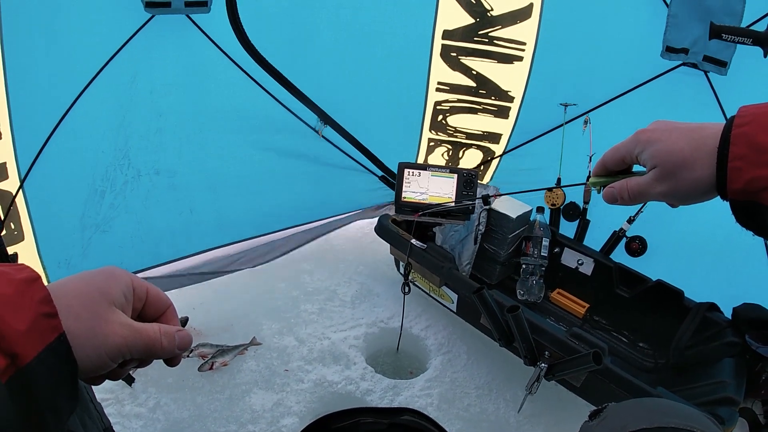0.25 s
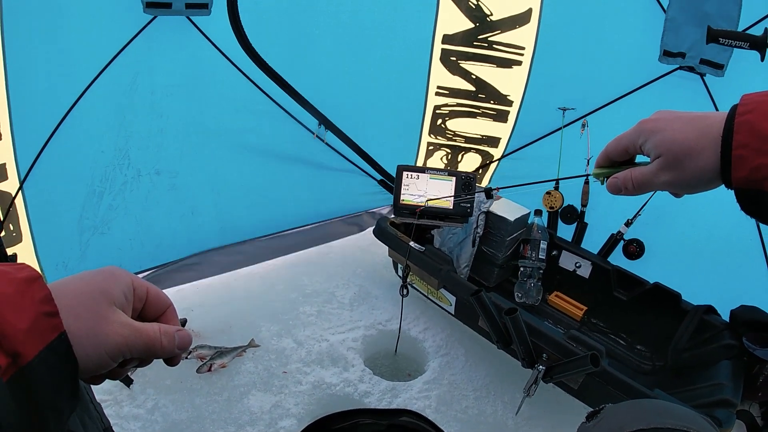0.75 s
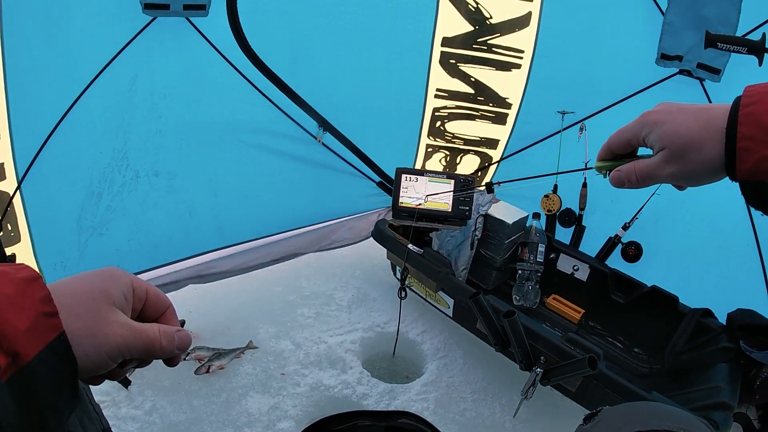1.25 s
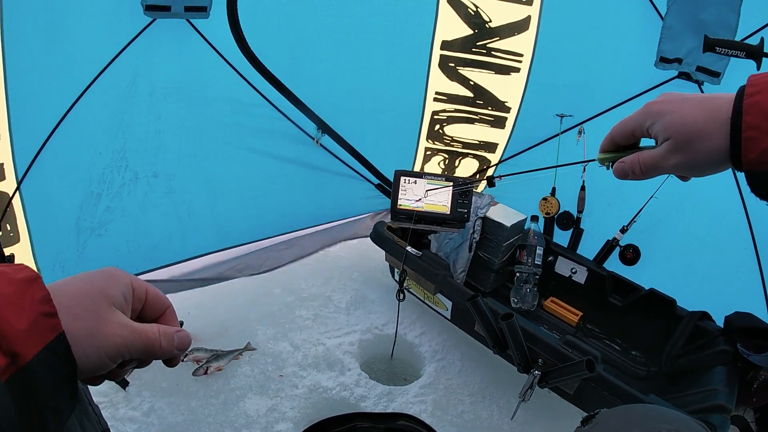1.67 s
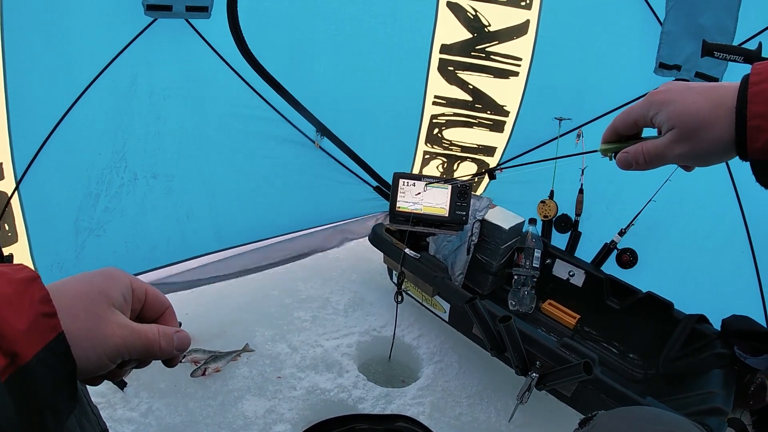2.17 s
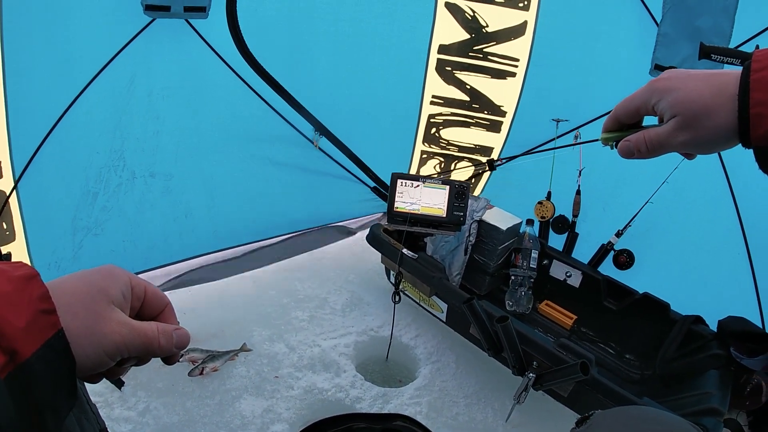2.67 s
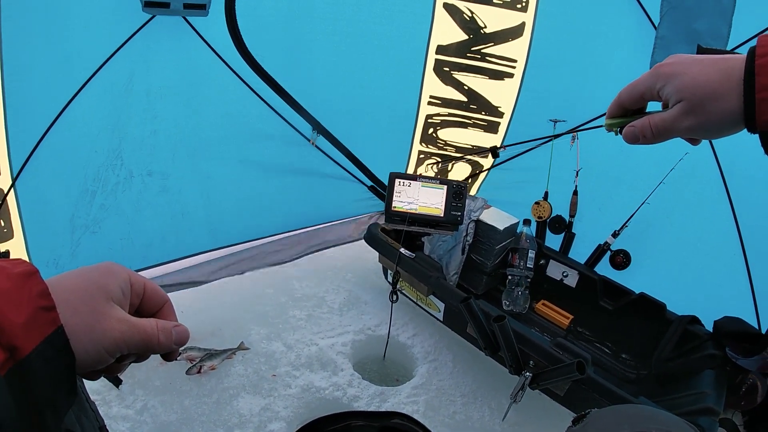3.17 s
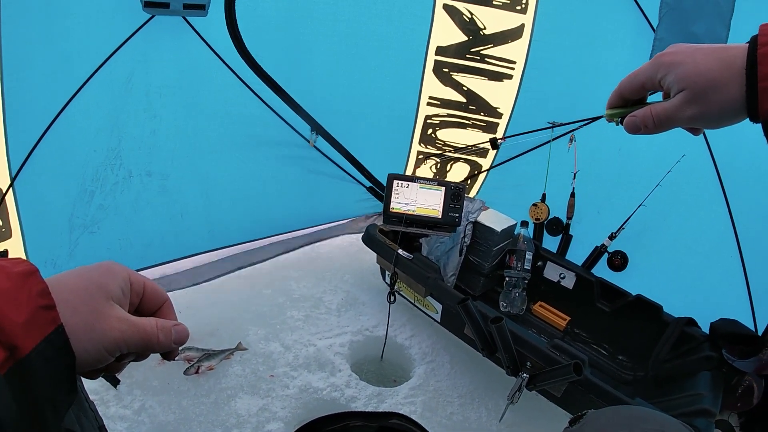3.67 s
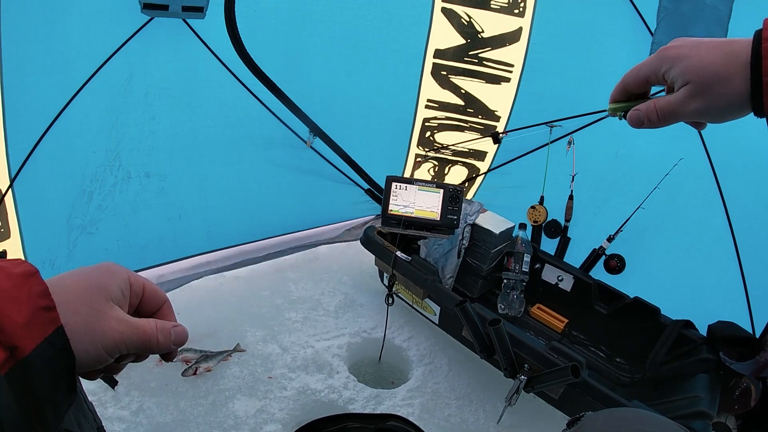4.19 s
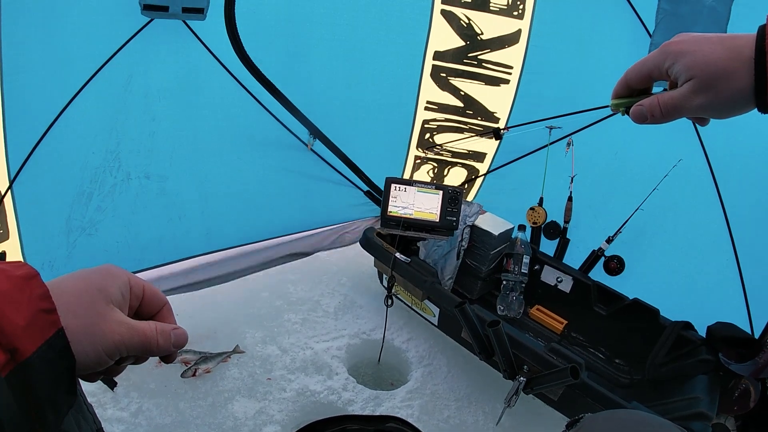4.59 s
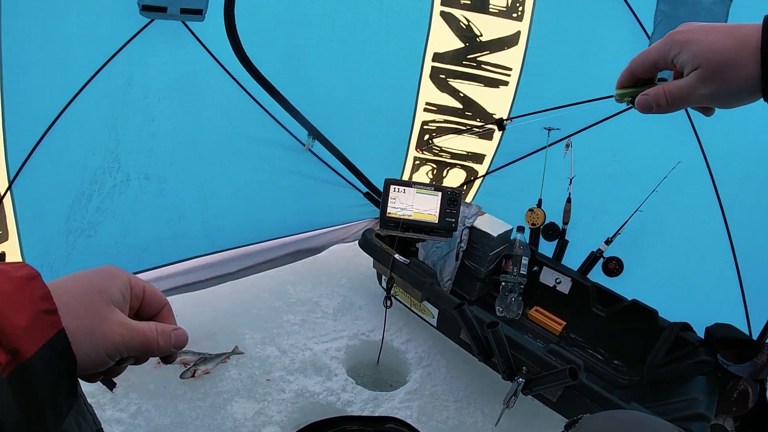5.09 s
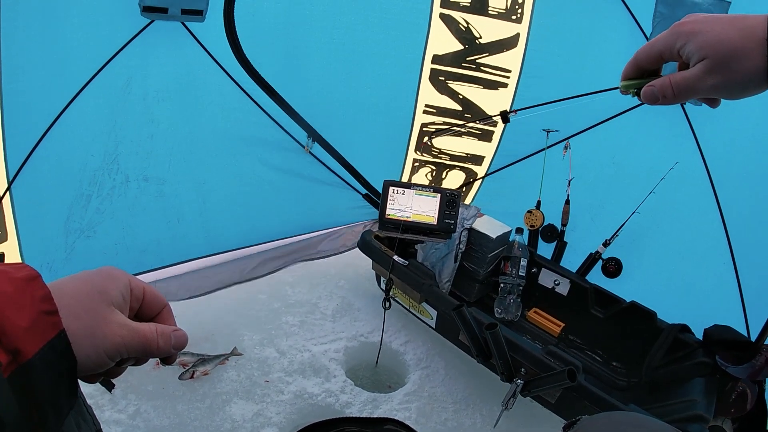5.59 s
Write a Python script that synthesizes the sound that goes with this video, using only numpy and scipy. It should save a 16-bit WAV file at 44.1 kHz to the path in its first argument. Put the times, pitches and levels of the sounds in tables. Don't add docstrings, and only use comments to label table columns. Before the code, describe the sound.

Loose shelter fabric flaps and crackles rapidly in a gale, with taut walls thumping and popping over low wind rumble and hollow roar.

```python
import sys
import numpy as np
from scipy import signal
from scipy.fft import rfft, irfft, next_fast_len
from scipy.io import wavfile
from scipy.ndimage import uniform_filter1d, map_coordinates

SR = 44100
rng = np.random.default_rng(int(sys.argv[2]) if len(sys.argv) > 2 else 0)


def undo_db(level):
    steps = np.asarray(level, float) / 20
    return 10 ** steps


def master(y):
    cut = np.clip(np.atleast_2d(y).T, -1, 1)
    pcm = np.round(cut * 32767)
    wavfile.write(sys.argv[1], SR, pcm.astype(np.int16))


N = 257892

# time in seconds, strength in dB.
WIND_LOAD = [(0.0, -22), (0.06, -19.5), (1.78, -22), (1.87, -27.5), (1.95, -18), (2.2, -24), (2.25, -33),
             (2.51, -24), (2.54, -31.5), (3.19, -20.5), (3.31, -27.5), (3.5, -21.5), (3.53, -25),
             (4.36, -24), (4.74, -34), (5.39, -29), (5.49, -32.5), (5.85, -31.5)]
# time in seconds, strength in dB.
WALL_STRAIN = [(0.0, -26), (0.15, -24), (0.72, -25.5), (0.76, -29.5), (0.81, -27), (0.98, -26.5),
               (2.65, -27.5), (2.69, -24), (2.75, -28.5), (3.0, -27), (3.63, -30.5), (3.83, -26),
               (4.58, -33), (4.61, -26.5), (4.76, -34), (5.85, -34.5)]
# time in seconds, share from 0 to 1.
MICROPHONE_TURN = [
    (0, 0),
    (4.2, 0),
    (4.58, 1),
    (5.85, 1),
]

# frequency in Hz, density in dB per Hz.
BUFFET_SPECTRUM = [(7.1, -53), (12, 1), (44, 1.5), (140, -10), (180, -31), (310, -120)]
# frequency in Hz, density in dB per Hz.
WALL_SPECTRUM = [(71, -46), (120, -5), (220, 0.5), (296, -4.5), (345, -8), (405, -10), (470, -19),
                 (610, -30), (1030, -120)]
# frequency in Hz, density in dB per Hz.
HOLLOW_SPECTRUM = [(250, -13), (430, -0.5), (470, -2), (550, 1.5), (626, -3), (853, 2.5), (932, -6.5),
                   (994, -0.5), (1070, -6.5), (1500, -14), (2600, -39)]
# frequency in Hz, density in dB per Hz.
HISS_SHADED = [(650, -27), (1100, 3), (1350, 1.5), (2780, 0.5), (4070, -6), (5520, -14), (6940, -28),
               (8530, -28.5), (10200, -36.5), (12400, -32), (13500, -41), (14900, -60), (16000, -66)]
# frequency in Hz, density in dB per Hz.
HISS_FACING = [(650, -40), (1100, 6), (1480, 2), (2750, -4), (4250, -2.5), (5760, -19), (7240, -31),
               (9110, -29), (12600, -42), (14900, -64), (16000, -68)]
# frequency in Hz, density in dB per Hz.
CLOTH_SHADED = [(350, -41), (600, -10), (851, -5.5), (930, -8.5), (1010, -6), (1100, -8), (2400, -8.5),
                (4360, -15), (5850, -22), (6300, -38), (8000, -55)]
# frequency in Hz, density in dB per Hz.
CLOTH_FACING = [(350, -49), (700, -3.5), (1030, -2.5), (1300, -6), (2760, -3.5), (4590, -11), (6300, -17),
                (7400, -16.5), (8300, -39), (10200, -42), (11500, -64), (15000, -70)]
# frequency in Hz, density in dB per Hz.
SHEEN_SPECTRUM = [(5000, 7), (6100, 5), (6820, -3), (8470, -7), (9500, -18), (10500, -27), (13000, -63)]
# frequency in Hz, density in dB per Hz.
AIR_SPECTRUM = [(5470, -13), (9300, -9.5), (10800, -11), (12500, -8), (13800, -13), (14900, -22),
                (16000, -28)]
# frequency in Hz, density in dB per Hz.
TICK_SPECTRUM = [(1800, -29), (3500, -2), (5800, 1), (6600, -22), (12500, -29), (15500, -45)]

# start in seconds, peak in dB, pitch in Hz.
PANEL_THUMPS = [(0.047, -9, 180), (0.087, -18, 129), (0.147, -12, 260), (0.227, -2.5, 171),
                (0.403, -6, 226), (0.502, -12, 140), (0.7525, -0.5, 227), (0.7655, 0, 236),
                (0.789, -8.5, 197), (0.834, -12.5, 169), (1.107, -8.5, 213), (1.783, -10.5, 160),
                (1.842, -15, 167), (2.04, -17, 278), (2.262, -29, 133), (2.261, -8, 222), (2.352, -15, 234),
                (2.677, -5.5, 236), (2.908, -9, 223), (2.977, -10, 222), (3.962, -10.5, 183),
                (4.01, -11, 194), (4.242, -31, 210), (4.504, -23, 234), (4.945, -21, 282),
                (5.326, -20.5, 163), (3.651, -18, 149), (4.589, -14, 186), (4.825, -16, 218),
                (5.077, -22, 227), (5.253, -14.5, 294), (5.451, -14, 218), (0.018, -11.5, 77),
                (0.522, -9.5, 79), (1.153, -8, 70), (1.505, -11.5, 109), (2.027, -13, 74.5),
                (4.011, -13, 73), (4.357, -23, 57.6), (3.42, -12, 89.6), (4.41, -15, 196), (3.86, -14, 400),
                (4.185, -16.5, 59), (4.69, -21, 70)]
# start in seconds, peak in dB, pitch in Hz.
CLOTH_POPS = [(0.051, -10, 530), (0.186, -22, 800), (0.203, -22, 760), (0.605, -23, 750), (0.969, -24, 860),
              (0.987, -23, 704), (1.129, -21, 790), (1.173, -19.5, 786), (1.28, -21, 830),
              (1.496, -15, 607), (1.549, -22, 744), (1.582, -21, 840), (1.769, -16.5, 999),
              (1.787, -16.5, 990), (2.268, -21, 697), (2.383, -26, 730), (2.48, -19, 860),
              (2.612, -17, 1020), (3.991, -15, 842), (4.139, -24, 684), (5.124, -27, 996), (5.24, -23, 990),
              (5.727, -23, 835), (0.127, -24, 568), (0.243, -17, 830), (0.322, -20, 955), (0.525, -17, 620),
              (0.531, -14, 820), (0.629, -12.5, 856), (0.665, -21, 846), (0.402, -29, 800),
              (0.777, -18, 890), (0.798, -15, 940), (0.805, -14, 870), (1.468, -16, 785),
              (1.506, -8.5, 536), (1.855, -15.5, 860), (2.059, -12, 600), (2.3, -13, 850),
              (2.398, -10.5, 805), (2.651, -14, 513), (2.689, -15, 850), (2.777, -17, 855),
              (2.838, -14.5, 706), (2.948, -17, 784), (3.055, -13, 1030), (3.37, -19, 496),
              (3.401, -18, 1100), (3.415, -20, 910), (3.832, -19, 725), (3.966, -18, 690),
              (4.074, -12, 870), (4.076, -14, 600), (4.522, -17, 970), (4.471, -19, 510),
              (4.637, -11.5, 563), (4.742, -14.5, 1020), (4.839, -19, 850), (4.953, -17, 740),
              (5.145, -17.5, 860), (5.488, -16.5, 840)]
# time in seconds, peak in dB, width in ms, push +1 or pull -1.
POLE_KNOCKS = [
    (4.2695, -15, .32, 1),
    (4.2871, -14, .27, 1),
    (4.5108, -9.5, .3, -1),
    (4.6065, -14, .25, -1),
]
# start in seconds, peak in dB, pitch in Hz.
CLOTH_WHISTLES = [
    (0.415, -24.5, 2210),
    (0.45, -35, 5130),
    (0.4, -36, 5600),
    (2.593, -47, 8200),
    (3.259, -42, 7360),
    (5.105, -51, 9600),
]
# start in seconds, peak in dB, pitch in Hz.
CREASE_SNAPS = [(0.1116, -25, 1700), (0.2364, -20, 1640), (0.41, -24, 2150), (0.5935, -24, 1840),
                (0.4923, -24, 2300), (0.8659, -22, 2710), (0.9487, -28, 1590), (1.1423, -38, 1500),
                (1.2511, -28, 1780), (1.3214, -27, 1620), (1.3443, -19.5, 3000), (1.4476, -32, 2150),
                (2.0577, -22, 1570), (2.2667, -23, 1830), (1.6607, -21, 1830), (2.179, -23, 1800),
                (2.391, -21, 2460), (2.692, -19, 1990), (2.7786, -27, 1540), (2.809, -20, 1610),
                (2.9158, -19, 2520), (3.0165, -25, 1960), (3.1308, -24, 1680), (3.2525, -20, 1970),
                (3.271, -21, 3200), (3.5124, -21, 2440), (3.7289, -31, 2010), (3.8327, -40, 1810),
                (4.8564, -19, 2620), (5.5618, -30, 2940), (4.0701, -16, 2070), (4.589, -32, 1870),
                (4.6059, -19, 1950), (4.7007, -23, 2710), (4.8324, -28, 1900), (4.9536, -16.5, 1680),
                (5.0997, -21, 2600), (5.2124, -35, 3000), (5.327, -21, 2980), (5.3477, -17, 2770),
                (5.452, -24, 2850), (5.472, -15.5, 2950), (5.696, -15.5, 2500), (5.7967, -26, 2800)]
# start in seconds, peak in dB.
LOOSE_SLAPS = [(0.1131, -37), (0.1216, -35), (0.3112, -38), (1.0615, -41), (2.4808, -44), (2.5735, -44),
               (2.7781, -38), (4.9721, -40), (5.4256, -38), (5.689, -38), (0.1885, -40), (0.3626, -35),
               (0.4095, -29), (0.5945, -42), (0.6784, -48), (0.7527, -44), (0.8545, -27), (0.9542, -27),
               (1.2531, -42), (1.3473, -31), (1.6008, -35), (1.7529, -38), (1.8447, -33), (1.9659, -41),
               (2.0522, -38), (2.2628, -41), (2.591, -43), (2.8125, -61), (2.9098, -31), (3.017, -30),
               (3.1467, -32), (3.26, -32), (3.9809, -42), (4.6074, -43), (4.7232, -43), (4.8554, -40),
               (4.9571, -52), (5.1003, -47), (5.3278, -40), (5.3502, -31), (5.474, -35), (5.5638, -28),
               (5.7992, -40)]
# start in seconds, peak in dB.
JERK_TICKS = [(0.1112, -24), (0.3112, -28), (0.4095, -22), (0.5083, -31), (0.5941, -29), (0.6779, -30),
              (0.7572, -28), (0.866, -29), (0.9493, -30), (1.2252, -34), (1.3216, -25), (1.3454, -23),
              (1.4477, -32), (1.668, -31), (1.7644, -35), (1.7644, -22), (1.8497, -29), (2.041, -27),
              (2.0528, -26), (2.179, -35), (2.2638, -26), (2.3531, -30), (2.391, -30), (2.4599, -31),
              (2.4808, -28), (2.5626, -38), (2.6669, -35), (2.779, -22), (2.9158, -36), (2.9163, -28),
              (3.0166, -19), (3.1303, -27), (3.2256, -27), (3.2436, -28), (3.271, -20), (3.6057, -34),
              (3.7075, -24), (3.7345, -35), (3.8108, -36), (3.8327, -26), (3.943, -33), (4.0702, -37),
              (4.2054, -34), (4.589, -29), (4.609, -37), (4.6993, -40), (4.8315, -33), (4.953, -36),
              (5.0774, -34), (5.1018, -32), (5.1837, -33), (5.2131, -30), (5.3243, -29), (5.4516, -28),
              (5.5618, -24), (5.6636, -23), (5.689, -28), (5.7968, -28)]
# start in seconds, peak in dB, rise in ms, sheen in dB.
QUICK_FLUTTER = [(0.004, -37.5, 40, -15), (0.11, -33.5, 30, -9), (0.183, -33.5, 7.6, -22),
                 (0.229, -40, 25, -20), (0.29, -37, 25, -9), (0.409, -36, 5, 3), (0.499, -34, 22, -19),
                 (0.589, -37, 18, -9), (0.6757, -33, 33, 1), (0.753, -34, 32, -19), (0.8658, -38, 7.2, -6),
                 (0.9463, -36.5, 5.5, -22), (1.05, -37, 27, -22), (1.136, -37, 19, -14),
                 (1.225, -39, 38, -19), (1.3173, -40, 46, -7), (1.44, -38, 24, -17),
                 (1.515, -36.5, 23, -21), (1.6008, -45.5, 5.5, -15), (1.662, -39, 5, -13),
                 (1.754, -34.5, 30, -19), (1.8476, -34.5, 11, -22), (1.96, -35.5, 14, -18),
                 (2.038, -36, 38, -22), (2.179, -34.5, 7.2, -23), (2.265, -32.5, 27, -25),
                 (2.353, -33.5, 39, -21), (2.4596, -35, 14, -31)]
# start in seconds, peak in dB, rise in ms, sheen in dB.
SLOW_FLAPS = [(2.562, -34.5, 51, -24), (2.667, -35, 40, -24), (2.777, -35, 37, 3), (2.9063, -36.5, 29, -23),
              (3.016, -33.5, 23, -28), (3.1275, -35, 26, -26), (3.2435, -35, 36, -22),
              (3.3493, -34, 24, -27), (3.473, -34, 56, -30), (3.5854, -35.5, 45, -30),
              (3.704, -32, 42, -31), (3.833, -33, 19, -26.5), (3.9392, -32.5, 47, -26),
              (4.067, -35, 5.9, -23.5), (4.2062, -40, 8, -40), (4.345, -42, 18, -56), (4.474, -42, 25, -53),
              (4.5884, -34, 30, -31), (4.698, -35.5, 15, -32), (4.8277, -37.5, 22, -28),
              (4.9548, -35, 17, -22), (5.07, -43, 8.5, -20), (5.0997, -37, 26, -20), (5.2108, -32, 19, -23),
              (5.323, -34, 29, -4), (5.4505, -36, 31, -5), (5.563, -34, 37, -3), (5.689, -32.5, 20, -23),
              (5.7964, -32, 28, -4)]


def unit(x):
    return x / np.sqrt(np.mean(x ** 2) + 1e-20)


def course(table):
    return np.interp(np.arange(N) / SR, *np.transpose(table))


def wobble(rate):
    knots = rng.standard_normal(int(N * rate / SR) + 4)
    return map_coordinates(knots, [np.arange(N) * rate / SR])


def colour(x, spectrum):
    size = next_fast_len(N + 8192)
    hz, db = np.transpose(spectrum)
    log_hz = np.log(np.fft.rfftfreq(size, 1 / SR) + 1)
    gain = undo_db(np.interp(log_hz, np.log(hz + 1), db, -120, -120))
    return unit(irfft(rfft(x, size) * gain, size)[:N])


def patchy(depth_db, bins=6, frames=8):
    z = signal.stft(rng.standard_normal(N + 512), nperseg=256)[2]
    field = uniform_filter1d(rng.standard_normal(z.shape), bins, axis=0)
    field = uniform_filter1d(field, frames, axis=1)
    return unit(signal.istft(z * undo_db(depth_db * unit(field)), nperseg=256)[1][:N])


def turned(x, shaded, facing):
    share = course(MICROPHONE_TURN)
    edge_hz, edge_rises = 5000, 1.3
    out = np.zeros(N)
    for k in np.arange(4) / 3:
        spectrum = facing if k == 1 else [
            (hz * edge_rises ** k if edge_hz < hz < edge_hz * 1.5 else hz, db) for hz, db in shaded]
        out += np.maximum(1 - 3 * abs(share - k), 0) * colour(x, spectrum)
    return out


def flaps():
    s, db, rise, sheen_db = np.transpose(QUICK_FLUTTER + SLOW_FLAPS)
    last_gap_ms = 140
    left = np.append(np.diff(s) * 1000, last_gap_ms) - rise
    fall = 9.4 + 0.67 * left
    return s, db, rise, fall, sheen_db


def strokes(extra_db, rise_scale, fall_scale):
    lead_ms, jump_db, swell_db_per_ms = 22.6, 6, 0.25
    before = 2205
    power = np.zeros(N + SR)
    ms = np.arange(-before, SR // 2) / SR * 1000
    starts, db, rises, falls, _ = flaps()
    for s, peak_db, rise, fall in zip(starts, db + extra_db, rises, falls):
        up = np.clip(rise * rise_scale, 3, 70)
        down = np.clip(fall * fall_scale, 35, 150)
        start_db = -swell_db_per_ms * up
        swell = np.interp(ms, [-lead_ms - 1, -1, 0, up],
                          [start_db - 10, start_db - jump_db, start_db, 0], -90)
        shape = np.where(ms < up, swell, -10 * (abs(ms - up) / down) ** 1.5)
        power[round(s * SR):][:len(ms)] += undo_db(peak_db + shape) ** 2
    return np.sqrt(power[before:N + before])


def buffeting(pumping):
    noise = patchy(0.56) * undo_db(0.7 * wobble(6.11))
    return undo_db(course(WIND_LOAD) + 0.5) * colour(noise, BUFFET_SPECTRUM) * pumping ** 0.33


def wall_drumming(pumping):
    noise = patchy(0.77) * undo_db(1.5 * wobble(30))
    return undo_db(course(WALL_STRAIN) - 0.5) * colour(noise, WALL_SPECTRUM) * pumping ** 0.28


def hollow_roar(pumping):
    t = np.arange(N) / SR
    strain_db = course(WALL_STRAIN)
    opening_db = 8.9 * np.exp(-t / 0.13)
    roar_db = -38.5 + 0.36 * (strain_db - strain_db.mean()) + opening_db
    noise = patchy(1.97) * undo_db(1.2 * wobble(45))
    return undo_db(roar_db) * pumping * colour(noise, HOLLOW_SPECTRUM)


def wind_hiss():
    t = np.arange(N) / SR
    load_db = course(WIND_LOAD)
    lull_db = 5.1 * np.exp(-((t - 4.38) / 0.16) ** 2)
    hiss_db = -46.5 + 0.21 * (load_db - load_db.mean()) + lull_db
    return undo_db(hiss_db) * turned(patchy(1.4), HISS_SHADED, HISS_FACING)


def wind():
    pumping = unit((strokes(0, 0.98, 0.97) + 0.003) ** 0.55)
    return buffeting(pumping) + wall_drumming(pumping) + hollow_roar(pumping) + wind_hiss()


def drum(hits, cycles, trim_db):
    out = np.zeros(N + SR)
    t = np.arange(SR // 5) / SR
    sides = np.sign(rng.standard_normal(len(hits)))
    for (s, db, hz), side in zip(hits, sides):
        turns = hz * t
        swell = 1 - np.exp(-(turns / 0.32) ** 2)
        ring = np.sin(2 * np.pi * turns) * np.exp(-turns / cycles(hz)) * swell
        out[round(s * SR):][:len(t)] += side * undo_db(db + trim_db) * ring / abs(ring).max()
    return out[:N]


def thumps():
    return drum(PANEL_THUMPS, lambda hz: 2.2, -7.5)


def pops():
    return drum(CLOTH_POPS, lambda hz: np.where(hz < 640, 0.9, 3.2), -5.5)


def knocks():
    out = np.zeros(N + SR)
    before = 100
    ms = np.arange(-before, 400) / SR * 1000
    for s, db, width, side in POLE_KNOCKS:
        push = np.exp(-(ms / width) ** 2)
        rebound = 0.53 * np.exp(-((ms - 3 * width) / (1.3 * width)) ** 2)
        out[round(s * SR) - before:][:len(ms)] += np.sign(side) * undo_db(db) * (push - rebound)
    return out[:N]


def whistles():
    return drum(CLOTH_WHISTLES, lambda hz: hz * 0.0047, -1.8)


def snaps():
    return drum(CREASE_SNAPS, lambda hz: 2.5, -4)


def bursts(hits, trim_db, t60):
    starts = np.zeros(N)
    t = np.arange(SR // 5) / SR
    starts[[round(hit[0] * SR) for hit in hits]] = undo_db(np.transpose(hits)[1] + trim_db)
    rise_ms = 0.3
    decay = undo_db(-60 * t / t60) * (1 - np.exp(-1000 * t / rise_ms))
    return signal.fftconvolve(starts, decay)[:N]


def creases():
    count, cycles, spread_db = 24000, 2.26, 2.0
    u = rng.random((count, 4))
    hz = 500 * 30 ** u[:, 1:2]
    t = np.arange(192) / SR
    size = hz * undo_db(-spread_db * np.log(u[:, 2:3] + 0.0019))
    size = size * np.sign(u[:, 3:] - 0.5)
    grain = size * np.sin(2 * np.pi * hz * t) * np.exp(-t * hz / cycles)
    at = (u[:, :1] * N).astype(int) + np.arange(len(t))
    return unit(np.bincount(at.ravel(), grain.ravel())[:N])


def skirt():
    s, db, _, _, sheen_db = flaps()
    crackle = 0.5 * creases() + 0.93 * patchy(1.4, bins=3, frames=12)
    crackle = crackle * undo_db(0.16 * wobble(60) + 0.67 * wobble(220))
    cloth = turned(crackle, CLOTH_SHADED, CLOTH_FACING)
    shiny = colour(crackle, SHEEN_SPECTRUM)
    airy = colour(crackle, AIR_SPECTRUM)

    body = undo_db(1.1) * strokes(0, 0.99, 0.73) * cloth
    sheen = undo_db(1.0) * strokes(np.minimum(sheen_db, -21), 0.62, 3.3) * shiny
    air_db = -31.5 - 0.54 * abs(sheen_db + 14.5)
    air = undo_db(1.5) * strokes(air_db, 0.5, 1.36) * airy

    opening_slaps = np.transpose([s, db + 0.74 * (sheen_db + 11.5)])
    slap_gain = bursts(opening_slaps, -25.5, t60=0.22) + bursts(LOOSE_SLAPS, -18.5, t60=0.2)
    slap = slap_gain * (undo_db(-5.5) * shiny + undo_db(-21.5) * airy)
    crease = bursts(CREASE_SNAPS, -23, t60=0.12) * cloth
    tick = bursts(JERK_TICKS, -11.5, t60=0.013) * colour(crackle, TICK_SPECTRUM)
    return body + sheen + air + slap + crease + tick


def scene():
    return (wind() + thumps() + pops() + knocks() + whistles() + snaps() + skirt())[None]


def roll_off(x):
    return signal.sosfilt(signal.butter(12, 15250, fs=SR, output="sos"), x)


def record(dry):
    low_pass = signal.butter(8, 15000, fs=SR, output="sos")
    mix = signal.sosfilt(low_pass, dry)
    return roll_off(mix)


dry = scene()
out = record(dry)
master(out)
```